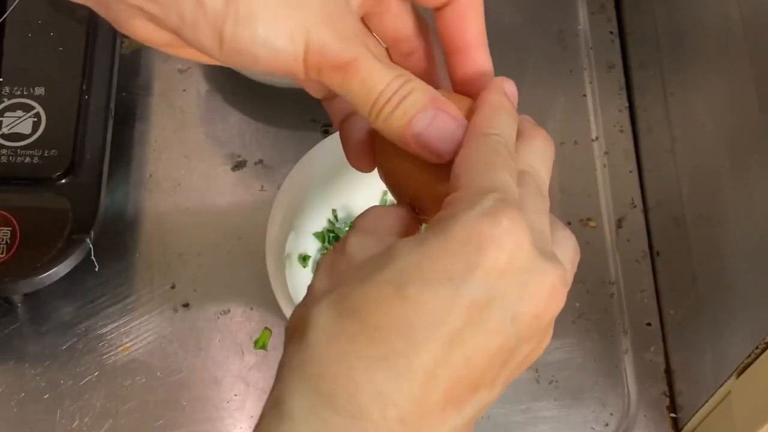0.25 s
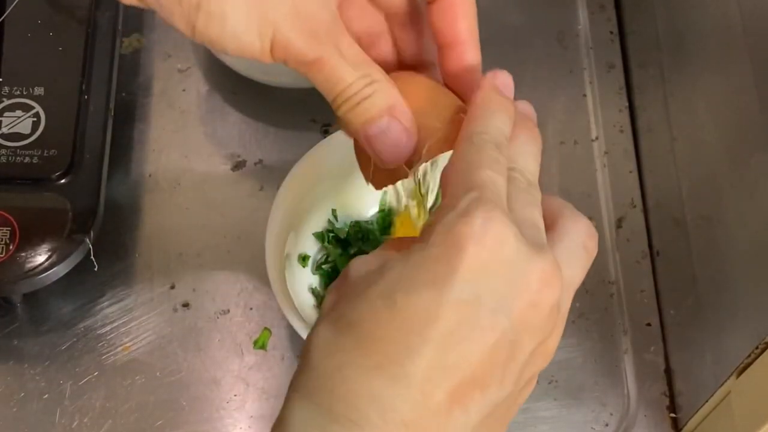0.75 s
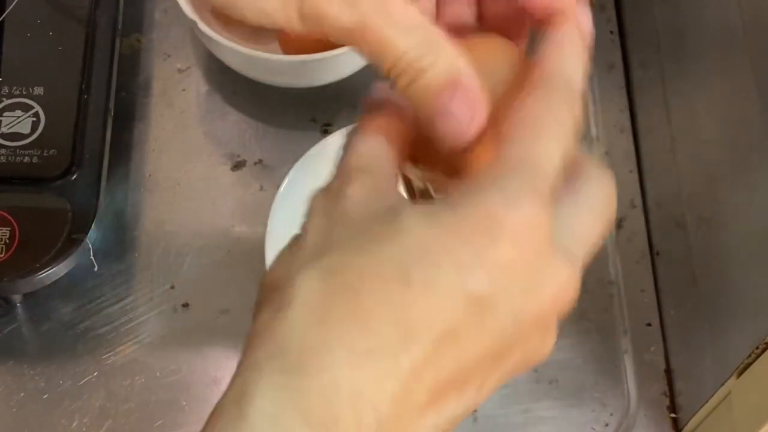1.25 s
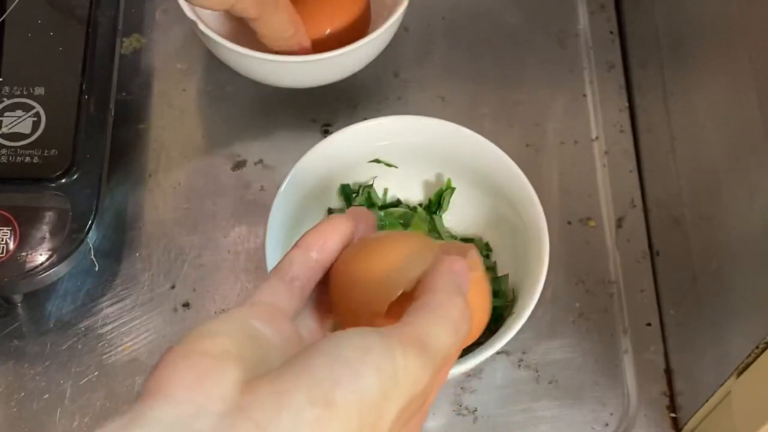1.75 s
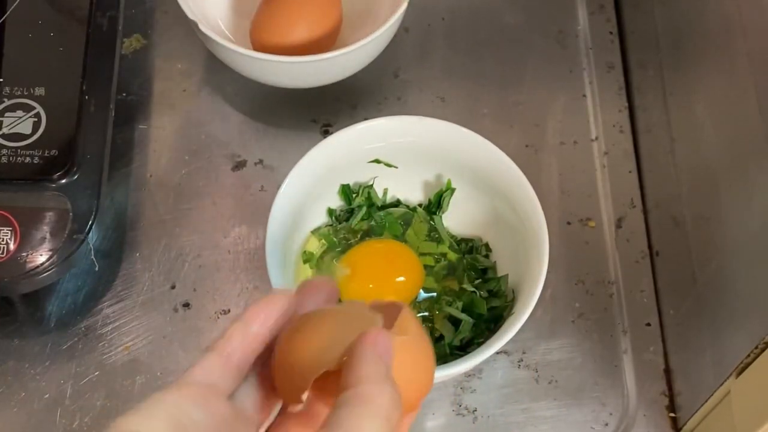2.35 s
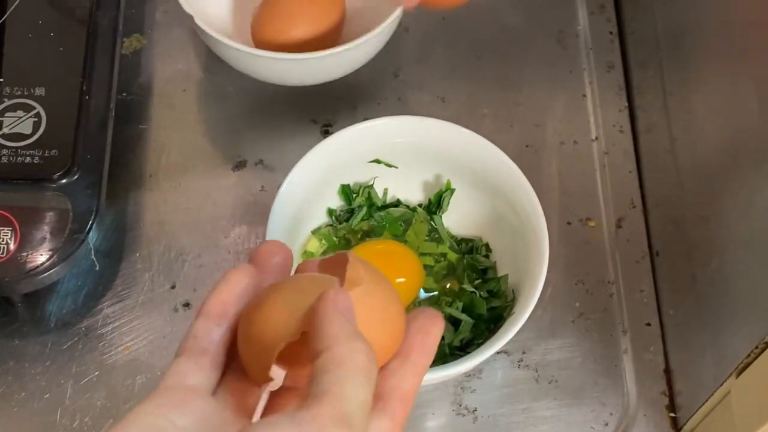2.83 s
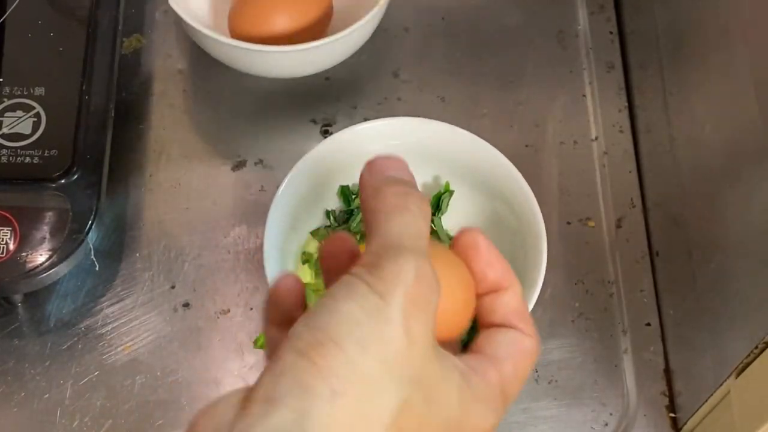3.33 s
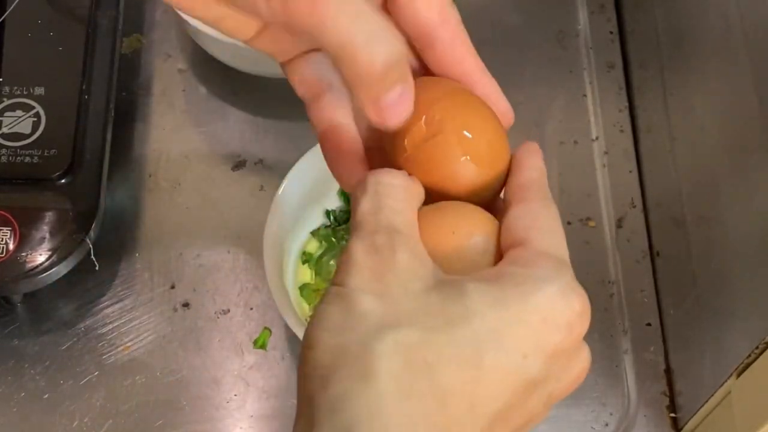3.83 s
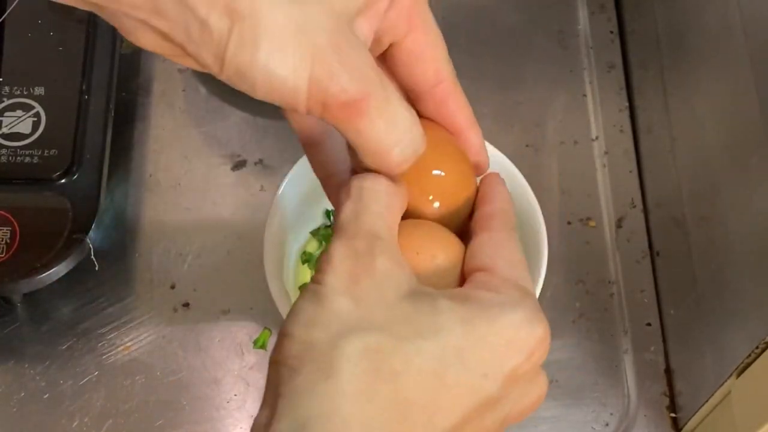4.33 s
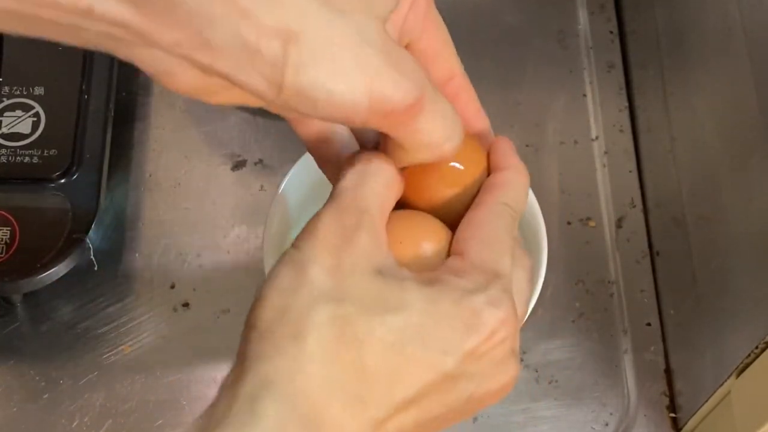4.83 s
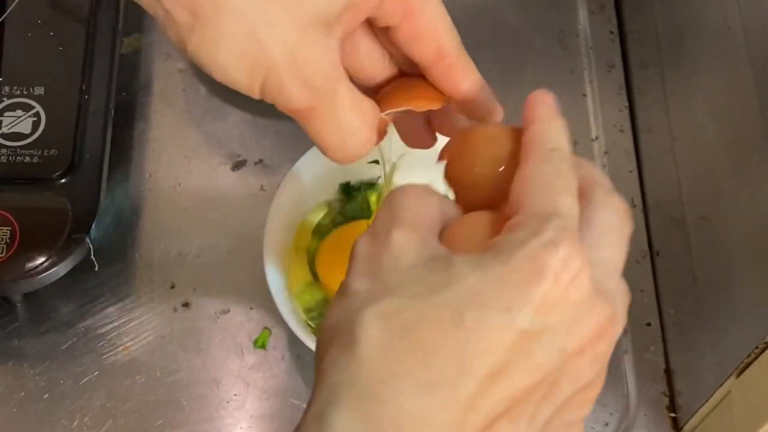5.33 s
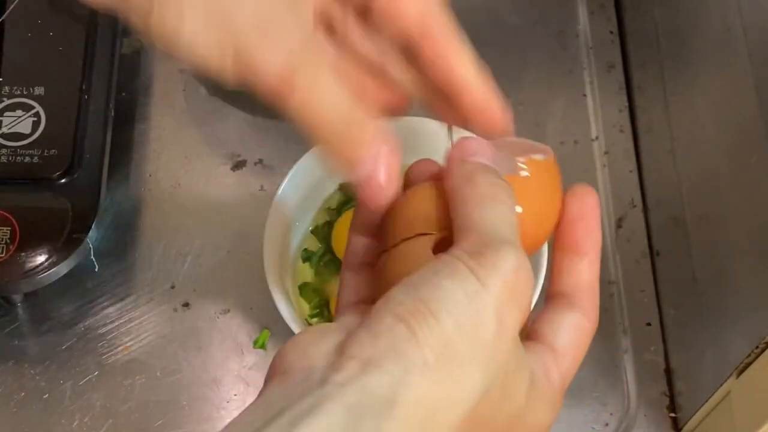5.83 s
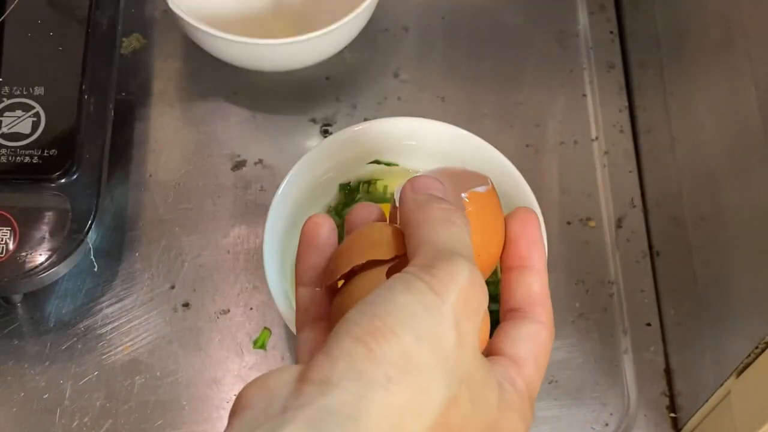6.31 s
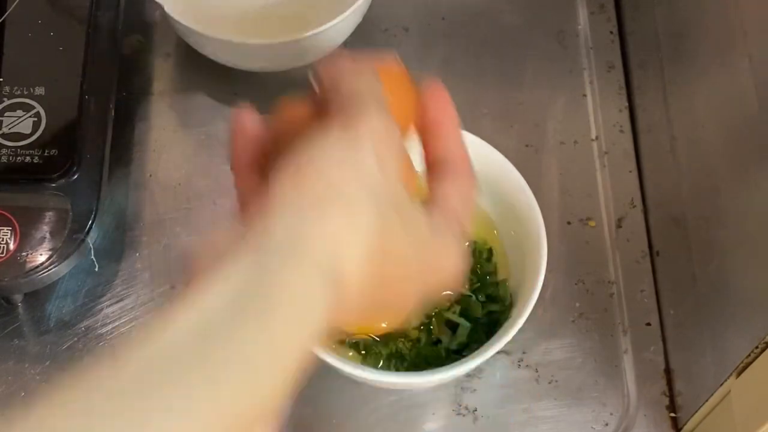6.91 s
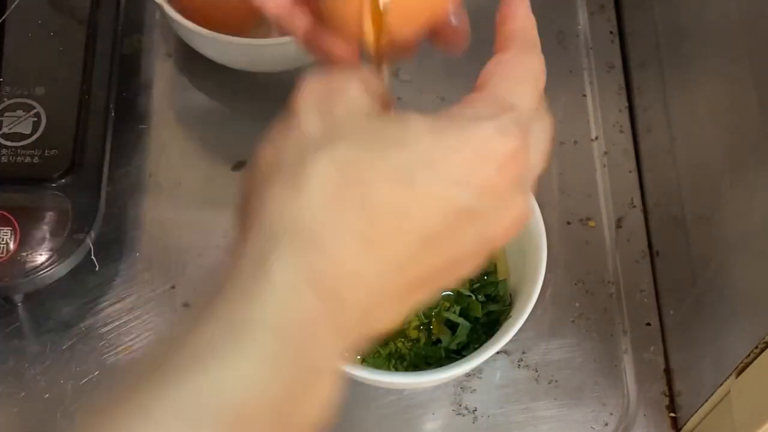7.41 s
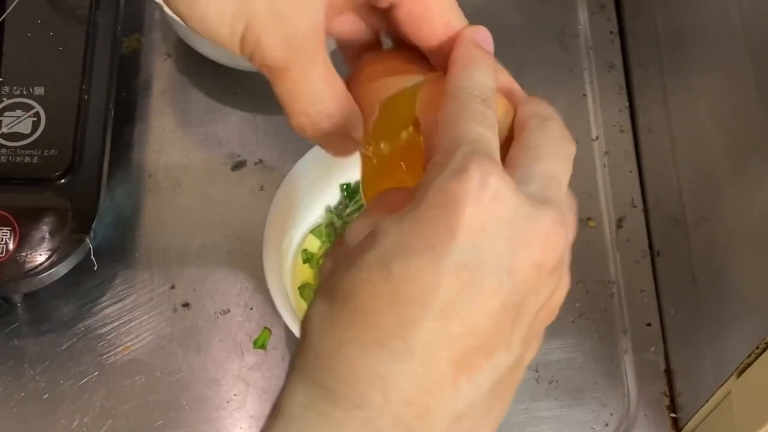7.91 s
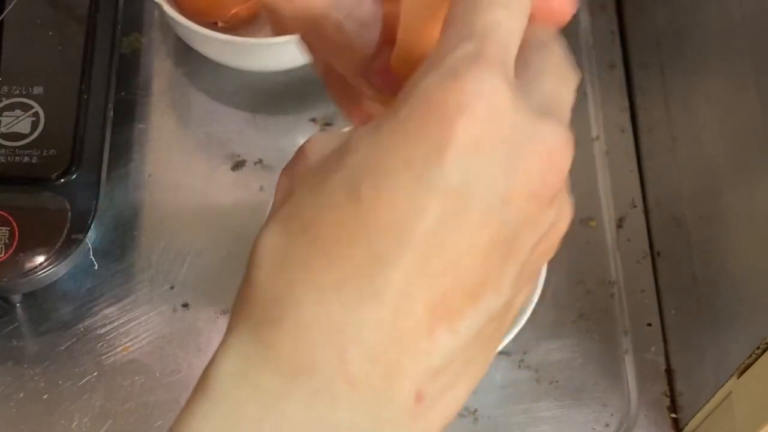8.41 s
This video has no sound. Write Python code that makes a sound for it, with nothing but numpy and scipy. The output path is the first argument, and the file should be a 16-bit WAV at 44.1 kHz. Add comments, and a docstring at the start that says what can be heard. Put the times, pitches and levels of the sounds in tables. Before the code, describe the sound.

A steady, low fan drone fills a kitchen. Near the phone microphone, eggs are cracked: first a quick brittle crackle, then heavy, soft thuds on thin steel with clattering dishes, light shell clicks and rubbing as they are thumbed open, further knocks, and another dense crisp break beside a softly pinging bowl. Short room tail, nearly centred stereo.

```python
"""In a kitchen, close to a phone, eggs are knocked against a ceramic bowl on a steel worktop, thumbed open and stacked.
Soft blows ring damped modes of the worktop, and loose crockery rattles after them in random clicks.
Shells snap in short noise bursts and crackle in fine fractures; touches wake the bowl's pinging modes.
An extractor fan drones behind, noise lifted by duct and room resonances; all is in stereo, nearly alike left and right.
"""
import sys
import numpy as np
from scipy import signal
from scipy.fft import rfft, irfft
from scipy.io import wavfile
from scipy.ndimage import uniform_filter1d

SR = 44100
rng = np.random.default_rng(int(sys.argv[2]) if len(sys.argv) > 2 else 0)


def transcribe(signal):
    """Save signal, clipped to [-1, 1], as a 16-bit WAV file at the path in sys.argv[1]."""
    frames = np.atleast_2d(signal).T
    limited = np.clip(frames, -1, 1)
    pcm = np.round(limited * 32767).astype(np.int16)
    wavfile.write(sys.argv[1], SR, pcm)


N = 381906  # samples

# Broad rush of the fan, its overall level set by FAN_DB.
# Each row: frequency in Hz, relative density in dB.
FAN_RUSH = [(25, -69), (45, -15.5), (110, -15), (210, -20.5), (320, -26.5), (600, -28.5), (1000, -34.5),
            (1600, -30.5), (2700, -32.5), (4000, -39), (6000, -43.5), (8500, -49.5), (12000, -56.5),
            (14000, -54.5), (15000, -68)]
# Duct and room resonances excited by the fan.
# Each row: centre in Hz, width in Hz, power added at the centre in dB relative to the rush.
DUCT_RESONANCES = [(55, 4.4, 3), (88.6, 9.1, 15.7), (143.44, 2.96, 22.6), (186.3, 7.3, 16.5),
                   (230.6, 6.7, 10.3), (281, 4.5, 11), (341.3, 5.4, 13.6), (369, 14, 2.6),
                   (395, 11.6, 16.6), (505.6, 23, 10.6), (533, 20, 6), (677, 9, 9.2), (722, 8.3, 3.6),
                   (761.4, 15.4, 13.4), (876, 71, 7.2), (1260, 24, 6.8), (1530, 67, 4.1), (2640, 38, 4.5)]
# Snaps of the shell.
# Each row: start in seconds, shard peak in dB, shard pitch in Hz, hollow in dB above the shard, hollow pitch in Hz.
SNAPS = [(0.5667, -15, 2760, -12, 1400), (0.5814, -5.5, 5600, -15, 1410), (0.5882, -1.5, 5600, -20, 1730),
         (0.593, -9, 4900, -14, 1780), (0.6002, -17, 3900, -6, 1950), (0.608, -35, 5000, -20, 1300),
         (0.6235, -29, 3250, -14, 1800), (0.6341, -14.5, 8500, -22, 1750), (0.6369, -22, 4000, -8, 1850),
         (0.642, -28, 6700, -5, 1800), (0.65, -31, 8000, -4, 1850), (0.6624, -21.5, 4160, -5, 1880),
         (0.6695, -34, 4000, -1, 1800), (0.686, -27, 7300, -4, 1830), (0.692, -28, 3600, -2, 1800),
         (0.723, -34, 7000, -10, 1800), (0.9458, -32, 3700, -7, 1270), (1.063, -32, 3430, -10, 1540),
         (1.168, -27, 4170, -10, 1530), (1.2114, -25, 7260, -7, 2220), (1.224, -22.5, 4440, -8, 2160),
         (1.389, -39, 6500, 5, 2100), (1.404, -33, 6400, -2, 2120), (1.429, -29, 6500, -8, 2200),
         (1.4315, -27, 5000, -7, 2120), (1.447, -40, 4500, -5, 2300), (1.4663, -22, 3450, -10, 2670),
         (1.6248, -28.5, 5650, -11, 2060), (1.708, -34, 6000, -10, 910), (2.754, -18.5, 6430, 7.5, 1300),
         (2.9642, -3.5, 6500, -5, 2160), (2.9656, -5, 3670, -6.5, 1450), (3.0571, -20, 5210, 0, 2430),
         (3.1812, -8.5, 7000, -9, 2150), (3.1815, -19, 3420, -5, 704), (4.217, -21, 3780, -14, 2070),
         (4.24, -26, 6120, -9, 1640), (4.4614, -28.5, 4930, -7, 1600), (4.4906, -16.5, 3700, -24, 2740),
         (4.623, -32, 3520, -14, 1990), (4.7291, -26, 4240, -6, 1350), (4.836, -21, 8140, -13, 900),
         (4.847, -25, 7340, -24, 2540), (4.8578, -19.5, 8300, -20, 2200), (5.041, -23, 3800, 2, 2300),
         (5.056, -30, 7000, -3, 2300), (5.069, -30, 7500, -12, 2300), (5.0807, -27.5, 5300, -3, 2470),
         (5.1489, -21, 7460, -6, 2700), (5.672, -27, 6900, -18, 2870), (5.6776, -31, 3680, 2, 1570),
         (5.706, -33, 5000, -8, 2620), (5.7237, -21, 4000, -20, 1610), (5.726, -26, 5900, -7, 1270),
         (5.732, -21.5, 3830, -19, 1300), (5.739, -31, 8000, -11, 1900), (5.745, -28, 4200, -12, 1500),
         (5.7915, -28, 7860, -6.5, 2000), (6.1483, -16.5, 3800, 0.5, 2370), (6.5534, -12, 3640, -8, 710),
         (6.5544, -20, 5000, 0, 2060), (6.557, -7, 6500, -24, 1420), (7.0895, -22, 3470, -12, 1670),
         (7.168, -18.5, 7400, 3.5, 1800), (7.17, -26.5, 3500, 7, 1130), (7.194, -10, 5900, -18, 1130),
         (7.2253, -14.5, 7310, -23, 2100), (7.2388, -3.5, 6640, -27, 2940), (7.2407, -4.5, 4930, -8, 2760),
         (7.247, -12.5, 5800, -18, 2580), (7.263, -7, 3660, -13, 2500), (7.2756, -9.5, 3860, -4.5, 1590),
         (7.285, -23, 4000, -2, 2460), (7.297, -28, 3200, -2, 2400), (7.314, -31, 5500, 0, 1560),
         (7.77, -28, 7000, -1, 2690), (7.8583, -24, 5040, -5.5, 2820), (7.886, -21, 6400, -14, 1220)]
# Fingers crush and rub the shells.
# Each row: start in seconds, length in seconds, crackle level at the grip in dB, crackle pitch in Hz,
# hollow in dB above the crackle.
RUBS = [(0.6, 0.15, -46, 3500, -12), (0.937, 0.3, -55.5, 9000, -3), (1.139, 0.091, -50, 4500, -10),
        (1.205, 0.044, -40.5, 7500, -6), (1.382, 0.18, -50, 8000, -14), (4.137, .11, -52, 6950, -11),
        (4.492, 0.14, -48, 5500, 4.5), (4.701, 0.058, -45, 4500, 1), (4.83, 0.054, -41.5, 7500, -3),
        (5.038, 0.065, -41, 6500, -16), (5.314, 0.022, -49, 8000, 1), (5.666, .03, -43, 8000, -6),
        (5.714, 0.058, -37.5, 4670, -11), (5.996, 0.023, -43.5, 8000, 3), (6.144, 0.094, -36, 3500, -8),
        (7.055, 0.077, -47, 5160, 4), (7.168, 0.025, -33, 1500, 2), (7.23, 0.28, -41.5, 5100, -4),
        (7.737, 0.12, -47.5, 6000, -19), (7.847, 0.045, -37.5, 6030, -7), (8.46, 0.11, -51, 5200, -1)]
# Knocks and bounces on the worktop.
# Each row: start in seconds, boom peak in dB, boom centre in Hz, deep thud in dB above the boom,
# reference level of the rattle in dB, brightness of the rattle in dB.
KNOCKS = [(2.751, -7, 162, -28, -13, -0.5), (2.759, -18, 612, -20, -40, 0),
          (2.79, -13.5, 140, -6, -37, -13), (2.831, -12, 100, -11, -24, 3.5),
          (2.858, -10, 177, -21, -29, 1), (2.965, -6, 124, -16, -21, 3.5), (3.028, -13, 164, -10, -28, -2),
          (3.058, -9, 202, -13, -31.5, 3.5), (3.134, -23, 160, -4, -47, -4),
          (3.183, -6.5, 125, -11, -25, 0.5), (3.205, -10.5, 140, -14, -30.5, 0.5),
          (3.228, -19, 170, -10, -33, 0.5), (3.252, -8, 163, -12, -23, 0.5), (3.294, -18, 110, 3, -27, 3),
          (3.33, -27, 152, -8, -38, 3.5), (3.352, -16, 173, -14, -35.5, 4), (6.02, -23.5, 100, -6, -45, -4),
          (6.088, -22, 110, -2, -38, -10), (6.15, -7, 150, -4, -19.5, 0.5), (6.156, -20, 632, -22, -45, 0),
          (6.172, -15, 187, -15, -30, -0.5), (6.175, -22, 644, -20, -45, 0),
          (6.186, -18, 185, -14, -40, -4), (6.224, -23, 110, -15, -35.5, 5),
          (6.252, -16, 164, -17, -51, -3), (6.555, -24, 400, 2, -27, 1), (6.565, -10, 118, -12, -28.5, -3),
          (6.603, -27, 644, -15, -38, 6), (6.611, -18.5, 151, -8, -41, 5), (7.168, -25, 140, -2, -35, 6.5),
          (7.269, -18, 142, -8, -46, 11.5)]
# Modes of the steel sheet. Each row: frequency in Hz, relative level in dB, free t60 in seconds.
WORKTOP_MODES = [(56.2, -5, 0.73), (72.3, 0, 0.17), (100, -1.5, 0.16), (140.3, 7, 0.14), (167.2, 0.5, 0.39),
                 (191.4, 1.5, 0.15), (239, -4.5, 0.11), (323, -14, 0.31), (404, -10.5, 0.26),
                 (454.5, -8, 0.14), (557, -14.5, 0.29), (621, -9, 0.15), (716, -15, 0.16),
                 (850, -21.5, 0.33), (920, -23, 0.13)]
# Resonances of the clattering crockery. Each row: centre in Hz, width in Hz, relative level in dB.
CLATTER_BANDS = [(1130, 760, 8), (1990, 92, 2.5), (2500, 150, -4)]
# Resonances of the treble sizzle. Each row: centre in Hz, width in Hz, relative level in dB.
SIZZLE_BANDS = [(3430, 5400, 6), (6500, 5800, -5), (12600, 12000, 7)]
# Sheet rattle, clatter and sizzle, in that order.
# Each row: level in dB above the knock's rattle, share of its brightness, t60 in seconds,
# first flash in dB above that level, flash t60 in seconds.
RATTLE_PARTS = [(-0.5, 0.14, 0.43, -9.5, 0.23), (-9, 1.22, 0.26, 2.5, 0.1), (-30, 1.2, 0.12, 12, 0.042)]
# An egg or shell touches the bowl.
# Each row: start in seconds, peak of the high modes in dB, then in dB above it the low modes and the middle modes.
PINGS = [(2.7531, -24, 3.5, -17), (2.9652, -36, 0, -3), (3.1797, -30, -1, -15), (6.1509, -43, 4, 0),
         (6.5585, -20.5, -16, -16), (7.1407, -39, -11, -14), (7.1926, -15.5, -31, -23),
         (7.2384, -26, -9, -16), (7.2766, -34.5, 14.5, -4), (7.3053, -49.5, 0, 13), (7.885, -39, -15, -21)]
# Modes of the ceramic bowl. Each row: frequency in Hz, relative level in dB, t60 in seconds.
BOWL_MODES = [(1455, -3, .12), (1560, -5, .08), (1630, 0, .13), (2310, -4, .25), (2450, -2, .12),
              (3270, -9, .14), (3620, 0, .19), (3700, -10, .04), (6420, 0, .07), (6750, -6, .04),
              (7800, -12, .04)]
# Stereo spread between left and right. Each row: frequency in Hz, unrelated share in dB.
STEREO_SPREAD = [(40, -31), (90, -27), (180, -21.5), (350, -11), (700, -8.5), (1300, -1.5), (1900, -6.5),
                 (2600, -32), (7800, -33), (9000, -18.5), (16000, -12.5)]
# Phase between the left and right channel. Each row: frequency in Hz, lead of the right in radians.
RIGHT_LEAD = [(800, 0), (1400, -0.84), (2400, 0), (8000, 0), (10000, 3), (12300, 7), (14700, 10),
              (17000, 10.5)]
# Level between the channels. Each row: frequency in Hz, left above right in dB.
LEFT_ABOVE_RIGHT = [(250, 0), (600, 2), (1200, -1.5), (2000, 0)]

FAN_DB = -33.5
# a snap's treble grows more slowly than its peak and rises with the shard's pitch
TREBLE_DB, TREBLE_PER_DB, TREBLE_DB_PER_OCTAVE, SHARD_HZ = -19.5, 0.8, 6.5, 5000
# crushed shell breaks into shards of many sizes; these rates and widths hold for each size
FRACTURES_PER_S, FRACTURE_SPREAD_DB, SHARD_WIDTH_PER_HZ = 400, 4.5, 0.082
SHARD_DB_PER_OCTAVE = -4  # away from the rub's pitch
SHELL_HOLLOW_HZ, SHELL_HOLLOW_WIDTH_HZ = 1740, 380
RUB_RISE_S, RUB_FADE_DB = 0.0052, -11.5  # grip, fall over the length of a rub
RUB_RELEASE = 0.46  # share of the rub spent letting go
DEEP_HZ, SHEET_HZ = 110, 300  # deep modes lie below the first, the rattling sheet above the second
BOOM_LAG_S = 0.00298  # the egg gives way before it loads the sheet
BOOM_DB_PER_OCTAVE = -5  # where the blow lands favours the modes near its centre
THUMP_DB, THUMP_T60_S = 7, 0.068  # the spot under the blow thumps at the centre pitch, above the sheet's modes
SHAKE_DB, SHAKE_RISE_S, SHAKE_T60_S = -9, 0.0062, 0.45  # the worktop shudders after each knock
RATTLE_RISE_S = 0.0053
BOWL_MIDDLE_HZ, BOWL_HIGH_HZ = 3400, 5000  # borders between the bowl's groups of modes
ROOM_DB, ROOM_T60_S = -13.5, 0.42
BOTTOM_HZ, TOP_HZ = 37.5, 16300  # the sound is cut below and above


def undb(db):
    """Turn decibels into an amplitude factor."""
    return 10 ** (np.asarray(db) / 20)


def unit(x):
    """Scale to rms 1."""
    return x / np.sqrt(np.mean(x ** 2))


def on_log(hz, table):
    """Read (Hz, value) rows on a log frequency axis."""
    table_hz, values = np.transpose(table)
    return np.interp(np.log(hz + 1), np.log(table_hz), values)


def band(x, hz, width):
    """Two-pole resonance, gain 1 at the centre."""
    return signal.lfilter(*signal.iirpeak(hz, hz / width, SR), x)


def bands(x, table):
    """Resonances side by side at their relative levels; rms 1."""
    return unit(sum(undb(db) * band(x, hz, width) for hz, width, db in table))


def ring(x, modes):
    """Damped modes struck by x, alternating in sign."""
    out = 0
    for k, (hz, db, t60) in enumerate(modes):
        radius = np.exp(-np.log(1000) / (t60 * SR))
        turn = 2 * np.pi * hz / SR
        poles = [1, -2 * radius * np.cos(turn), radius * radius]
        out = out + (-1) ** k * undb(db) * signal.lfilter([np.sin(turn)], poles, x)
    return out


def grains(per_s, spread_db):
    """Random clicks, most small and a few large; rms 1."""
    size_db = spread_db * np.minimum(rng.exponential(size=N), 2.5)
    size = undb(size_db) * rng.standard_normal(N)
    return unit(size * (rng.random(N) < per_s / SR))


def walk(rate):
    """Slow random wander, rms 1, from steps drawn at the given rate and smoothed twice."""
    k = int(SR / rate)
    steps = np.repeat(rng.standard_normal(N // k + 1), k)
    return unit(uniform_filter1d(uniform_filter1d(steps, k), k)[:N])


def strike(times, peaks_db, modes, contact_s):
    """Blows of the given contact time on the modes, each ringing up to its peak level."""
    push = np.zeros(16384)
    contact = int(contact_s * SR) + 3
    push[:contact] = np.hanning(contact)
    response = ring(push, modes)
    response = response / np.abs(response).max()
    out = np.zeros(N + len(push))
    for s, db in zip(times, peaks_db):
        i = int(s * SR)
        out[i:i + len(push)] += undb(db) * response
    return out[:N]


def dying(times, db, t60, rise_s):
    """A level that builds up at each blow and dies away; blows add in power."""
    blows = np.zeros(N)
    blows[(times * SR).astype(int)] = undb(db) ** 2
    power = signal.lfilter([1], [1, -undb(-120 / (t60 * SR))], blows)
    keep = np.exp(-1 / (rise_s * SR))
    return signal.lfilter([1 - keep], [1, -keep], np.sqrt(power))


def fan():
    """Air noise lifted by narrow duct and room resonances; the rush swells a little."""
    hz = np.fft.rfftfreq(N, 1 / SR)
    lift = 1 + sum(undb(db) ** 2 / (1 + (2 * (hz - f) / w) ** 2) for f, w, db in DUCT_RESONANCES)
    spectrum = rfft(rng.standard_normal(N)) * undb(on_log(hz, FAN_RUSH))
    rush = irfft(spectrum * np.sqrt(lift), N)
    return unit(rush) * undb(FAN_DB + 1.27 * walk(1.857))


def shells():
    """Each snap is one sharp break and a fading spray of fractures, coloured by the shard and the hollow half shell."""
    size = 2048
    out = np.zeros(N + size)
    t = np.arange(size) / SR
    noise = rng.standard_normal((len(SNAPS), size))
    for spray, (s, db, hz, hollow_db, hollow_hz) in zip(noise, SNAPS):
        treble_db = TREBLE_DB + TREBLE_PER_DB * db + TREBLE_DB_PER_OCTAVE * np.log2(hz / SHARD_HZ)
        burst = 6 * (t == 0) + spray * (np.exp(-t / 0.0014) + 0.2 * np.exp(-t / 0.01))
        broad = band(band(burst, 3700, 6600), 5000, 7200)
        shard = band(burst, hz, 0.067 * hz) + undb(-7) * broad
        hollow = band(band(burst, hollow_hz, 0.14 * hollow_hz), hollow_hz, 0.73 * hollow_hz)
        treble = band(band(burst, 10000, 10000), 10000, 10000)
        # the treble level is that of its narrow middle
        middle = band(band(treble, 6900, 2500), 6900, 2500)
        parts = ((shard, shard, db), (hollow, hollow, db + hollow_db), (treble, middle, treble_db))
        i = int(s * SR)
        for part, gauge, part_db in parts:
            out[i:i + size] += undb(part_db) * part / np.abs(gauge).max()
    return out[:N]


def rubbing():
    """Fine fractures, each ringing a shard of its own size, and the hollow: a rub grips quickly, fades and lets go."""
    out = np.zeros(N)
    pitches = np.geomspace(1500, 13000, 16)
    shards = np.array([unit(band(grains(FRACTURES_PER_S, FRACTURE_SPREAD_DB), hz, SHARD_WIDTH_PER_HZ * hz))
                       for hz in pitches])
    hollow = unit(band(grains(400, 2.7), SHELL_HOLLOW_HZ, SHELL_HOLLOW_WIDTH_HZ))
    airy = unit(band(grains(1500, 5), 11500, 6000))
    for s, length, db, hz, hollow_db in RUBS:
        now = slice(int(s * SR), int((s + length) * SR))
        t = np.arange(now.stop - now.start) / SR
        hold = np.clip(np.minimum(t / RUB_RISE_S, (length - t) / (RUB_RELEASE * length)), 0, 1)
        grip = hold * undb(db + RUB_FADE_DB * t / length)
        shard_gains = undb(SHARD_DB_PER_OCTAVE * np.abs(np.log2(pitches / hz)))
        crackle = unit(shard_gains @ shards[:, now])
        out[now] += grip * (crackle + undb(-14) * airy[now] + undb(hollow_db) * hollow[now])
    return out


def worktop():
    """Soft blows and the shudder after them ring the steel sheet; loose crockery clatters and sizzles along."""
    deep = [m for m in WORKTOP_MODES if m[0] < DEEP_HZ]
    low = [m for m in WORKTOP_MODES if m[0] < SHEET_HZ]
    high = [m for m in WORKTOP_MODES if m[0] >= SHEET_HZ]
    s, db, boom_hz, deep_db, rattle_db, bright_db = np.transpose(KNOCKS)
    # an egg is a soft hammer
    late = s + BOOM_LAG_S
    boom = strike(late, db + deep_db, deep, contact_s=0.0046)
    for at, peak_db, centre in zip(late, db, boom_hz):
        modes = [(hz, mode_db + BOOM_DB_PER_OCTAVE * abs(np.log2(hz / centre)), t60)
                 for hz, mode_db, t60 in WORKTOP_MODES[len(deep):]]
        thump = (centre, THUMP_DB, THUMP_T60_S)
        boom = boom + strike([at], [peak_db], modes + [thump], contact_s=0.0014)
    # the low modes need some cycles to build up
    shake = unit(ring(rng.standard_normal(N), low))
    out = boom + shake * dying(late, db + SHAKE_DB, SHAKE_T60_S, SHAKE_RISE_S)
    # the rattle comes in uneven bumps
    rattle = grains(2500, 1.8) * undb(1.1 * walk(45))
    # hands and bowls damp the sheet while it rattles
    sheet = unit(ring(rattle, [(hz, mode_db, 0.098 * t60) for hz, mode_db, t60 in high]))
    parts = (sheet, bands(rattle, CLATTER_BANDS), bands(rattle, SIZZLE_BANDS))
    for part, (part_db, share, t60, flash_db, flash_t60) in zip(parts, RATTLE_PARTS):
        level_db = rattle_db + part_db + share * bright_db
        level = dying(s, level_db, t60, RATTLE_RISE_S)
        flash = dying(s, level_db + flash_db, flash_t60, RATTLE_RISE_S)
        out = out + part * (level + flash)
    return out


def bowl():
    """Where and how hard the ceramic is touched decides which group of modes wakes."""
    s, db, low_db, middle_db = np.transpose(PINGS)
    low = [m for m in BOWL_MODES if m[0] < BOWL_MIDDLE_HZ]
    middle = [m for m in BOWL_MODES if BOWL_MIDDLE_HZ < m[0] < BOWL_HIGH_HZ]
    high = [m for m in BOWL_MODES if m[0] > BOWL_HIGH_HZ]
    return (strike(s, db, high, contact_s=0)
            + strike(s, db + middle_db, middle, contact_s=0)
            + strike(s, db + low_db, low, contact_s=0))


def room(near):
    """The kitchen's short tail: coloured noise dying away after a brief gap, of energy 1 before its level."""
    t = np.arange(int(0.5 * SR)) / SR
    tail = band(rng.standard_normal(len(t)), 2800, 6900)
    tail = tail * np.exp(-np.log(1000) * t / ROOM_T60_S) * (t > 0.004)
    tail = tail / np.sqrt(np.sum(tail ** 2))
    return undb(ROOM_DB) * signal.fftconvolve(near, tail)[:N]


def scene():
    """Near sounds with the kitchen's short tail over the fan, the same left and right."""
    drone = fan()
    near = shells() + rubbing() + worktop() + bowl()
    air = near + room(near) + drone
    return np.array([air, air])


def record(dry):
    """Left and right share most sound, differ by a scattered part and drift apart in treble phase; peaks round off."""
    hz = np.fft.rfftfreq(N, 1 / SR)
    t = np.arange(8192) / SR
    scatter = rng.standard_normal(len(t)) * np.exp(-t / 0.05)
    scatter = scatter / np.sqrt(np.sum(scatter ** 2))
    unlike = undb(on_log(hz, STEREO_SPREAD)) * rfft(scatter, N)
    # half the phase lead and half the level difference go to each channel
    turn = np.exp(0.5j * on_log(hz, RIGHT_LEAD)) / undb(on_log(hz, LEFT_ABOVE_RIGHT) / 2)
    left_right = np.array([(1 + unlike) / turn, (1 - unlike) * turn])
    stereo = irfft(rfft(dry) * left_right, N)
    stereo = signal.sosfilt(signal.butter(4, BOTTOM_HZ, "high", fs=SR, output="sos"), stereo)
    rounded = np.tanh(0.8 * stereo) / 0.8
    return signal.sosfilt(signal.ellip(8, 0.2, 70, TOP_HZ, fs=SR, output="sos"), rounded)


dry = scene()
out = record(dry)
transcribe(out)
```